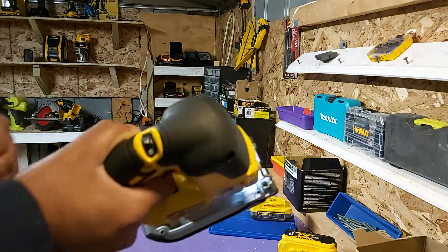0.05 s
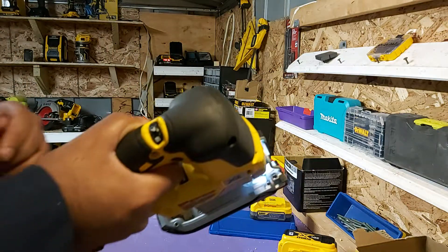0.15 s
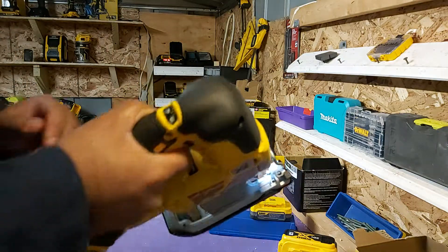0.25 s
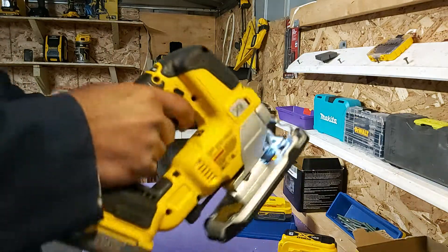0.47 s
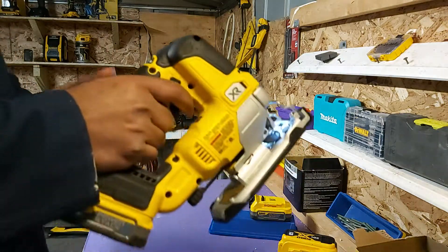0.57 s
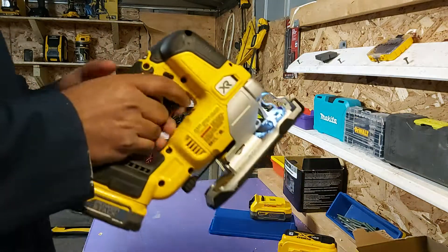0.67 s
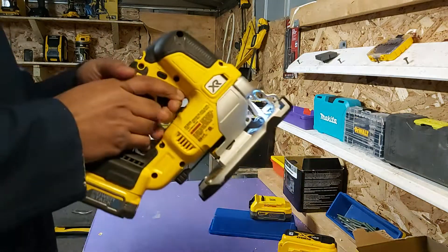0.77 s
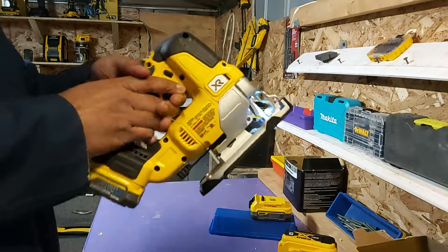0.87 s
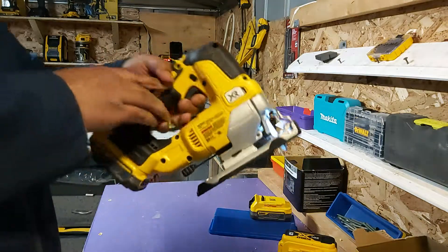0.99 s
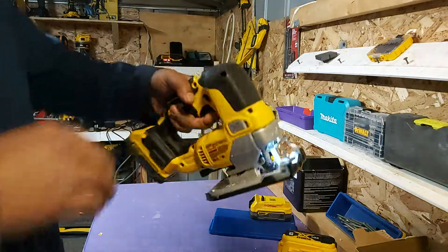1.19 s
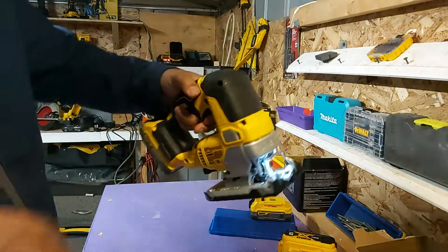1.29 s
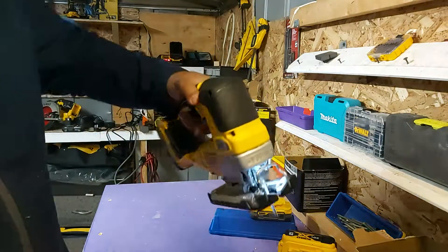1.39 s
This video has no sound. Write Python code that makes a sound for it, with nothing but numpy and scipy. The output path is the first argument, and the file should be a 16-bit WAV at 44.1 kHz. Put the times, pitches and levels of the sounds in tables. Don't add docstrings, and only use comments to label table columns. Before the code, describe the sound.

A cordless jigsaw, close, in a small workshop with short reverberation. The end of an earlier run fades by 0.1 s, with a dry trigger tick. At 0.15 s it starts, rising to a bright, rattling, metallic whine around 0.3-0.46 s, then drops in pitch and stops by 0.6 s. Low machinery rumble, soft grip rubbing, sleeve brushing and faint thuds follow until it restarts at 1.42 s.

```python
import sys
import numpy as np
from scipy import signal
from scipy.fft import rfft, irfft, next_fast_len
from scipy.io import wavfile
from scipy.ndimage import uniform_filter1d

SR = 44100
rng = np.random.default_rng(int(sys.argv[2]) if len(sys.argv) > 2 else 0)


def voltage_ratio(decibels):
    exponent = np.asarray(decibels, float) / 20
    return 10 ** exponent


def inscribe(sig):
    pcm = np.round(np.clip(np.atleast_2d(sig).T, -1, 1) * 32767)
    wavfile.write(sys.argv[1], SR, pcm.astype(np.int16))


N = 63945

TEETH_PER_STROKE, CONTACTS_PER_STROKE = 120.8, 300
FULL_SPEED_HZ = 6200


def rms_one(x):
    return x / np.sqrt(np.mean(x ** 2) + 1e-20)


def in_time(rows):
    s, *columns = np.transpose(rows)
    return [np.interp(np.arange(N) / SR, s, c) for c in columns]


def at_hz(points, hz):
    table = np.array(points)
    return np.interp(np.log(hz), np.log(table[:, 0]), table[:, 1])


def drift(rate):
    r = np.exp(-16 * np.pi * rate / SR)
    slow = signal.lfilter([1], [1, -2 * r, r * r], rng.standard_normal(N // 8 + 2002))[2000:]
    return np.interp(np.arange(N) / 8, np.arange(len(slow)), rms_one(slow))


def near_middle(mid, side, side_db):
    return mid + voltage_ratio(side_db) * side * [[1], [-1]]


# f/Hz, likeness [-1 to 1]
LIKENESS_OF_EARS = [(60, 0.75), (180, 0.76), (550, 0.43), (1650, 0.24), (4970, -0.25), (15000, 0.14)]
# f/Hz, left minus right level/dB
LEFT_OVER_RIGHT = [(60, -1), (180, 0.5), (550, 0.5), (1650, -0.5), (4970, 0.0), (15000, -3.5)]


def two_ears(mid, side, hz):
    alike = np.clip(at_hz(LIKENESS_OF_EARS, hz), -1, 1)
    ears = np.sqrt(1 + alike) * mid + np.sqrt(1 - alike) * side * [[1], [-1]]
    return ears * voltage_ratio(at_hz(LEFT_OVER_RIGHT, hz) * np.array([[.5], [-.5]]))


def coloured(pairs, spectrum, patchy_db, shift_db=lambda hz: 0):
    out = 0
    edges = 140 * 2 ** np.arange(0, 7.1, .5)
    for k, (low, high) in enumerate(zip(edges, edges[1:])):
        band = signal.butter(2, [low, high], "band", fs=SR, output="sos")
        mid, side = signal.sosfilt(band, pairs[k % 2])
        hz = np.sqrt(low * high)
        level_db = at_hz(spectrum, hz) + shift_db(hz) + patchy_db * drift(8.8)
        out = out + voltage_ratio(level_db) * two_ears(mid, side, hz)
    return rms_one(out)


def hiss(spectrum, patchy_db):
    return coloured(rng.standard_normal((2, 2, N)), spectrum, patchy_db)


def resonate(x, hz, width_hz):
    r = np.exp(-np.pi * width_hz / SR)
    poles = [1, -2 * r * np.cos(2 * np.pi * hz / SR), r * r]
    return signal.lfilter(np.array([1, 0, -1]) * (1 - r * r) / 2, poles, x + 1e-18)


# t/s, tooth whine f/Hz, rattle level/dB, whine level/dB
MOTOR_COURSE = [(0, 2500, -36, -75), (.012, 2294, -39.5, -64), (.09, 1007, -61, -77),
                (.1445, 1000, -85, -88), (.1465, 2000, -31, -66), (.2, 3700, -21, -41),
                (.245, 4663, -18.5, -36.5), (.285, 5737, -16, -32), (.34, 6253, -18.5, -28),
                (.39, 6209, -17.5, -30), (.43, 6014, -16.5, -27), (.46, 5514, -15.5, -45),
                (.51, 4280, -22.5, -36), (.56, 2492, -53, -86), (.64, 997.8, -105, -69),
                (1.422, 994.4, -65, -91), (1.424, 2000, -26, -57), (1.45, 2780, -29.5, -43.5)]


def motor():
    tooth_hz, rattle_db, whine_db = in_time(MOTOR_COURSE)
    teeth = np.cumsum(tooth_hz) / SR
    return teeth, teeth / TEETH_PER_STROKE, tooth_hz / FULL_SPEED_HZ - 1, rattle_db, whine_db


def contacts(strokes):
    repeat_share, spread_db, throb_db = 0.69, 1, 2.24

    def random_hits(count):
        return voltage_ratio(spread_db * rng.exponential(1, (4, count))) * rng.choice([-1, 1], (4, count))

    place = (strokes * CONTACTS_PER_STROKE).astype(int)
    hit = np.diff(place, prepend=0) > 0
    pattern = random_hits(CONTACTS_PER_STROKE)[:, place % CONTACTS_PER_STROKE]
    loose = random_hits(N)
    train = hit * (np.sqrt(repeat_share) * pattern + np.sqrt(1 - repeat_share) * loose)
    density = uniform_filter1d(hit * 1., size=400) + .01
    throb = voltage_ratio(throb_db * np.cos(4 * np.pi * strokes))
    return (train / np.sqrt(density) * throb).reshape(2, 2, N)


# f/Hz, level/dB per Hz
RATTLE_COLOUR = [(240, -47), (400, -19.5), (800, -5.5), (1100, -11.5), (2100, 0), (3400, -6), (6000, -4),
                 (16000, -13)]


def rattle(trains, slack):
    def shift_db(hz):
        treble_db = 12 * np.clip(np.log2(hz / 3500), 0, 1)
        body_db = 27.5 * (hz < 880)
        return slack * (treble_db + body_db)

    at_rest_db = -11
    return voltage_ratio(-at_rest_db * slack) * coloured(trains, RATTLE_COLOUR, patchy_db=1.8, shift_db=shift_db)


# f/Hz, width/Hz, level/dB at full speed, gain/dB at rest
HOUSING_MODES = [(660.4, 12.7, -31.5, -13.5), (834, 160, -17.5, -2.5), (988, 54, -19.5, 12.5),
                 (1132, 19, -20, 6.5), (1460, 35, -21, 16), (1590, 85, -13.5, 7.5), (1916, 120, -11, 7.5),
                 (2000, 120, -13, 6), (2324, 160, -9.5, 3), (3020, 280, -4.5, -16),
                 (3293, 114.26, -11, 4.5), (3689, 140, -16.5, 16.5), (4070, 83, -15.5, 13.5),
                 (8980, 300, -15, -12.5)]


def housing(trains, slack):
    rings = 0
    for k, (hz, width_hz, db, rest_db) in enumerate(HOUSING_MODES):
        mid, side = rms_one(resonate(trains[k % 2], hz, width_hz))
        rings = rings + voltage_ratio(db - rest_db * slack) * two_ears(mid, side, hz)
    return voltage_ratio(-2.24) * rings


# multiple of the tooth rate, level/dB, width/Hz
WHINE_PARTIALS = [(.537, -1, 130), (1, -1, 70), (1.555, .5, 260), (2, -5, 600)]


def whine(teeth):
    out = 0
    for times, db, width_hz in WHINE_PARTIALS:
        turn = 2 * np.pi * times * teeth
        core = 1.1 * (times == 1)

        def wavering():
            return (core + drift(width_hz)) * np.cos(turn) + drift(width_hz) * np.sin(turn)

        out = out + voltage_ratio(db) * two_ears(wavering(), wavering(), times * FULL_SPEED_HZ)
    return out


def saw():
    teeth, strokes, slack, rattle_db, whine_db = motor()
    trains = contacts(strokes)
    struck = voltage_ratio(rattle_db - 4) * (rattle(trains, slack) + housing(trains, slack))
    radiated = signal.butter(4, 252, "high", fs=SR, output="sos")
    return signal.sosfilt(radiated, struck + voltage_ratio(whine_db) * whine(teeth))


# multiple of the stroke rate, level/dB against the whine
STROKE_OVERTONES = [(7, -17), (8, -20), (9, -21), (11, -14), (13, 1.5), (15, -2.5), (16, -5), (30, -4),
                    (39, -4)]


def stroke_tones():
    _, strokes, slack, _, whine_db = motor()
    out = 0
    for times, db in STROKE_OVERTONES:
        mid, side = np.sin(2 * np.pi * (times * strokes + rng.random((2, 1))))
        out = out + voltage_ratio(db + 2.5 * drift(3.8)) * near_middle(mid, side, side_db=-13)
    return voltage_ratio(whine_db - 2 + 30 * slack) * out


def workshop(x):
    t60_s, wall_cut_hz, alike_below_hz = 0.35, 13200, 1100
    size = next_fast_len(N + SR)
    z = np.exp(-2j * np.pi * np.arange(size // 2 + 1) / size)
    dull = np.exp(-2 * np.pi * wall_cut_hz / SR)
    wall = (1 - dull) / (1 - dull * z)
    out = []
    for ear, lags in zip(x, (rng.uniform(.009, .035, (2, 8)) * SR).astype(int)):
        response = 0
        for k, lag in enumerate(lags):
            loop = voltage_ratio(-60 * lag / SR / t60_s) * wall * z ** lag
            response = response + (-1) ** k * loop / (1 - loop)
        out.append(irfft(rfft(ear, size) * response, size)[:N])
    left, right = out
    side = signal.lfilter(*signal.butter(1, alike_below_hz, "high", fs=SR), left - right)
    return near_middle(left + right, side, side_db=0) / 2


# f/Hz, width/Hz, level/dB
RUMBLE_BANDS = [(30, 18, -84.5), (50, 4.7, -59), (70.25, 6.5, -54), (84.2, 12, -53.5), (111.4, 27, -53)]
# f/Hz, level/dB per Hz
AIR_COLOUR = [(88, -32), (150, -6.5), (745, -13), (1390, -28.5), (1630, -15), (1760, -21.5), (3620, -30.5),
              (16000, -40)]


def room_tone():
    def narrow(hz, width_hz):
        noise = rng.standard_normal((2, N + SR))
        return rms_one(resonate(resonate(noise, hz, width_hz), hz, width_hz)[:, SR:])

    mid, side = sum(voltage_ratio(db) * narrow(hz, width_hz) for hz, width_hz, db in RUMBLE_BANDS)
    rumble = near_middle(mid, side, side_db=-15.5)
    air = voltage_ratio(-55.5) * hiss(AIR_COLOUR, patchy_db=2.9)
    return rumble + air + voltage_ratio(-74) * narrow(7400, 600)


# t/s, level/dB, f/Hz, length/s
TOUCH_EVENTS = [
    (0.0069, -37.5, 61, 0.042),
    (0.72, -58.5, 1650, 0.011),
    (1.078, -60, 2430, .012),
    (1.089, -50, 62, 0.03),
    (0.597, -50.5, 110.5, 0.037),
    (0.55, -46.5, 93, 0.033),
    (1.25, -47, 58, 0.026),
    (1.378, -43.5, 87, 0.044),
    (0.044, -64, 390, 0.061),
]


def touches():
    t, out = np.arange(N) / SR, 0
    for s, db, hz, length in TOUCH_EVENTS:
        mid, side = rms_one(resonate(rng.standard_normal((2, N)), hz, 0.1 * hz))
        swell = voltage_ratio(db) * np.exp(-((t - s) / length) ** 2)
        out = out + swell * near_middle(mid, side, side_db=-15.5)
    return out


# f/Hz, level/dB per Hz
TICK_COLOUR = [(900, -33.5), (1800, 1.5), (4000, 2.5), (7000, 0), (11000, -5.5), (16000, -22)]


def trigger():
    start_s, hold_s, fade_s, level_db = .1, .0067, .006, -42
    t = np.arange(N) / SR - start_s
    shape = (t > 0) * np.exp(-np.clip(t - hold_s, 0, 1) / fade_s)
    return voltage_ratio(level_db + 2.5 * drift(150)) * shape * hiss(TICK_COLOUR, patchy_db=.5)


def rubbing(rows, colour, patchy_db):
    before, after = (rows[0][0] - .05, -95), (rows[-1][0] + .05, -95)
    db, = in_time([before] + list(rows) + [after])
    return voltage_ratio(db + 6.5) * hiss(colour, patchy_db)


# t/s, level/dB
GRIP_COURSE = [
    (0.66, -64),
    (0.786, -62.5),
    (0.816, -71),
    (0.92, -74),
    (0.936, -68),
    (1.084, -63),
    (1.096, -67),
    (1.276, -56.5),
    (1.41, -59),
]
# f/Hz, level/dB per Hz
SKIN_COLOUR = [(290, -42), (500, -0.5), (621, -18), (740, 3.5), (1020, -5.5), (4150, -4.5), (16000, -21)]


def grip():
    return rubbing(GRIP_COURSE, SKIN_COLOUR, patchy_db=1.2)


# t/s, level/dB
SLEEVE_COURSE = [
    (.92, -77),
    (.948, -66.5),
    (.99, -63),
    (1.035, -62.5),
    (1.05, -79),
    (1.15, -67),
    (1.22, -64.5),
    (1.39, -80),
]
# f/Hz, level/dB per Hz
CLOTH_COLOUR = [(2350, -44), (4000, -6), (4650, 10.5), (12000, 9), (16000, -4)]


def sleeve():
    return rubbing(SLEEVE_COURSE, CLOTH_COLOUR, patchy_db=.8)


def scene():
    tool = saw() + trigger()
    hands = touches() + grip() + sleeve()
    return tool + stroke_tones() + voltage_ratio(-15) * workshop(tool) + room_tone() + hands


def top_cut(x):
    return signal.sosfilt(signal.butter(12, 16430, fs=SR, output="sos"), x)


def record(dry):
    top = signal.cheby2(16, 60, 16300, fs=SR, output="sos")
    mix = signal.sosfilt(top, dry)
    return top_cut(mix)


dry = scene()
out = record(dry)
inscribe(out)
```